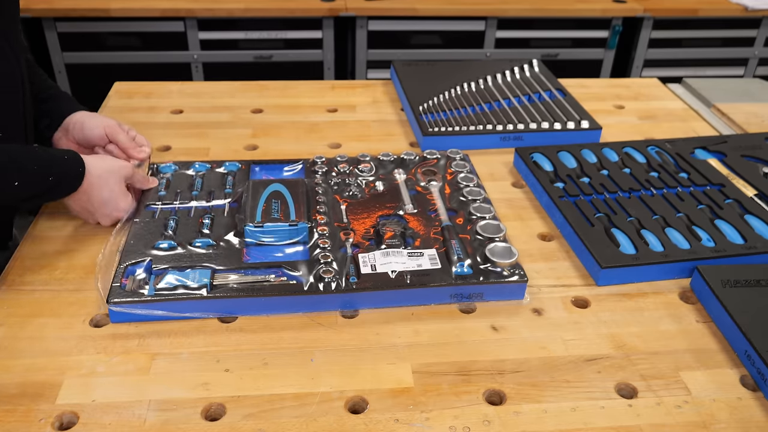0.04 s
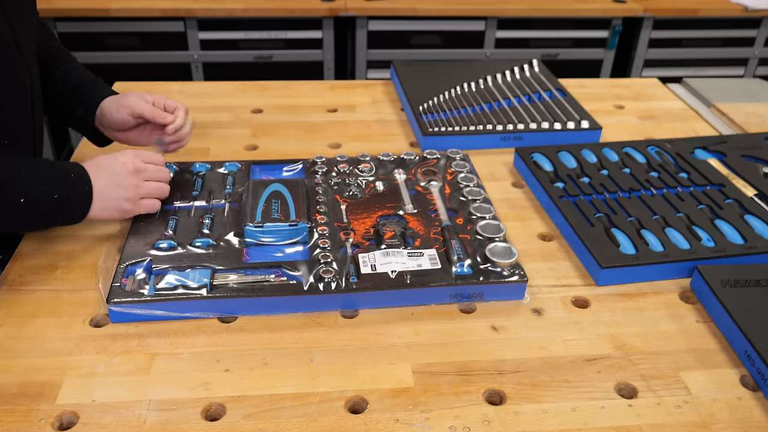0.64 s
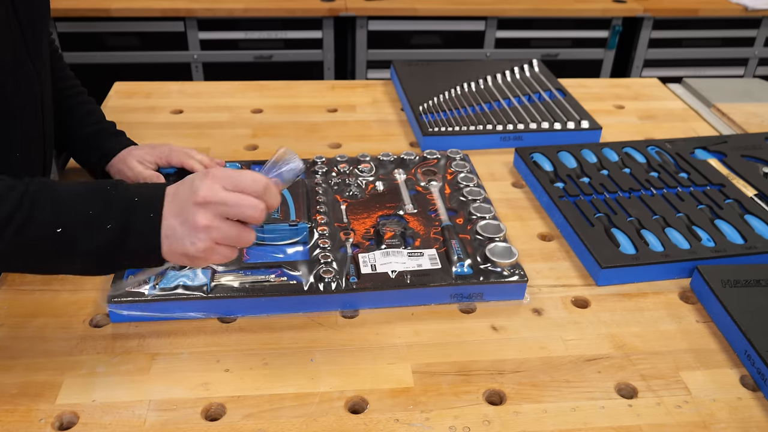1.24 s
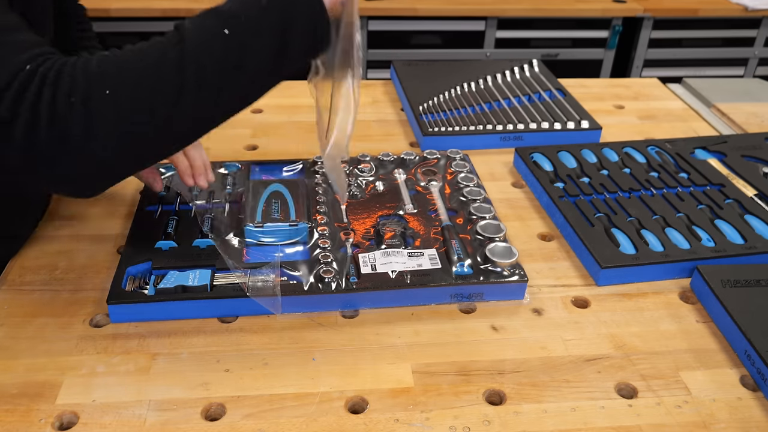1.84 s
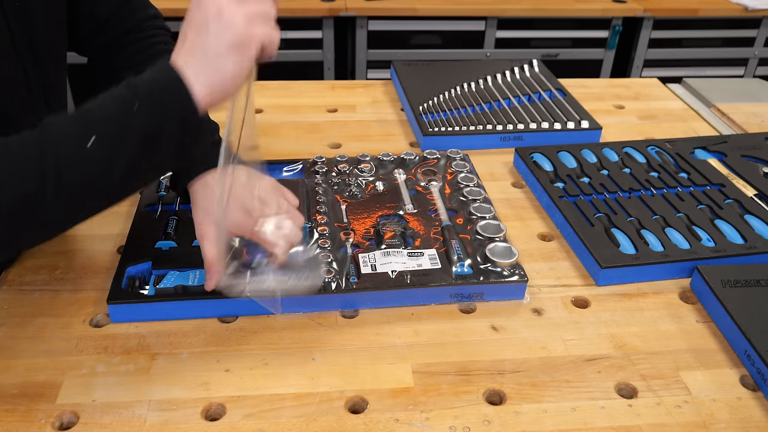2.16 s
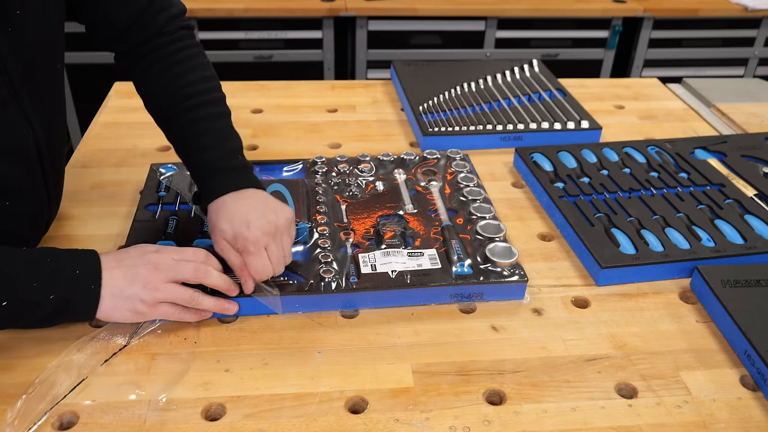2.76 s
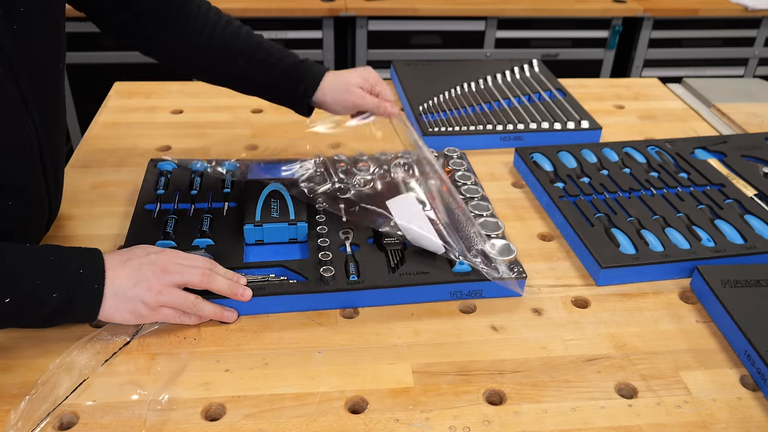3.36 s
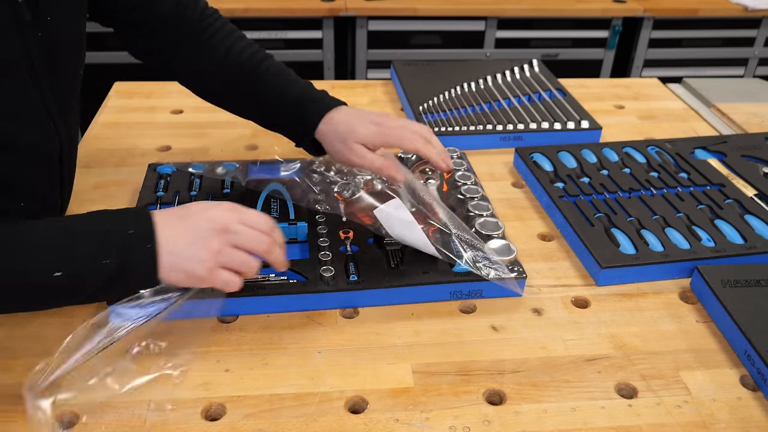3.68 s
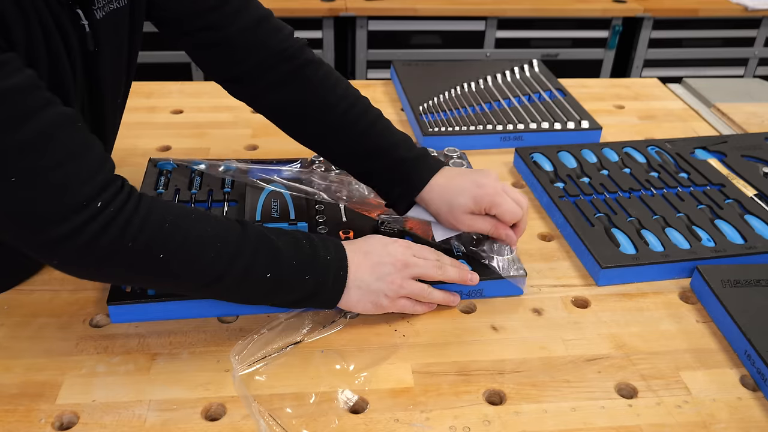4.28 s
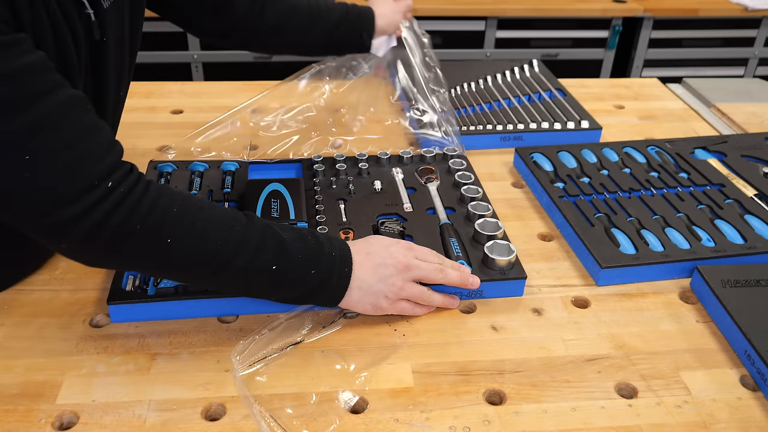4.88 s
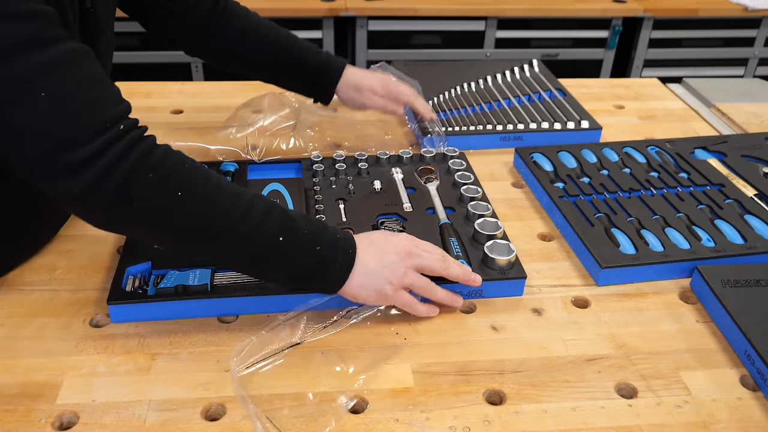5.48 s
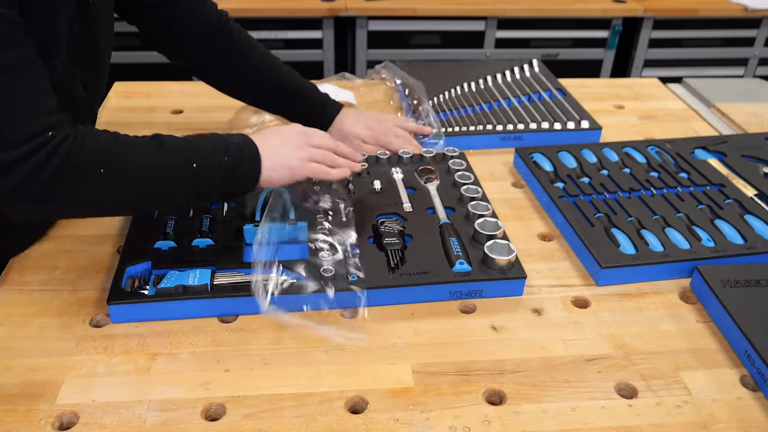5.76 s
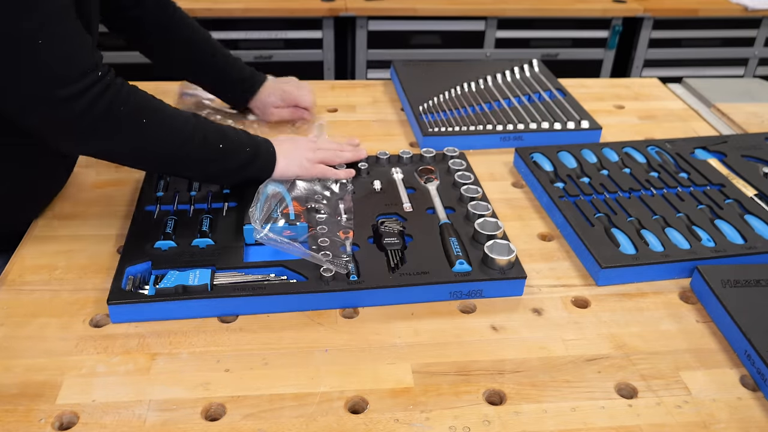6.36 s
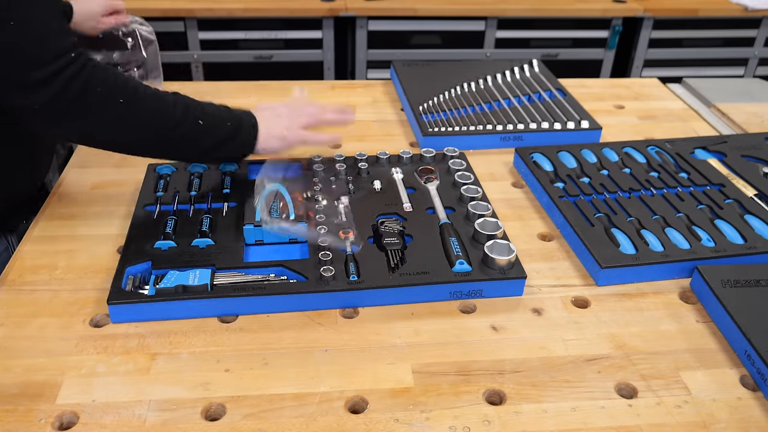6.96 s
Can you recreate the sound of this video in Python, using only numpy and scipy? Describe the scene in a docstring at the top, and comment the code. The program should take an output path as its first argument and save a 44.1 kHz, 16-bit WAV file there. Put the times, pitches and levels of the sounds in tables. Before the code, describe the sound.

In a quiet workshop, hands pull and scrunch thin plastic wrap from a foam tray, heard close up. A small rip opens the sound, then come about four swells of bright crackling with single sharp snaps and softer rustling between them. A few dull bumps on the bench sound underneath. A brief hollow swish comes in the last swell as the film slides away, over faint, low room noise.

```python
"""At a bench in a quiet workshop, thin plastic film is peeled off a foam tray and scrunched by hand.
Creases buckle in swarms, each radiating a bright tick and flapping the sheet around it; the biggest
snap through singly. The pulled film tears at a corner, splits along its edge and hisses over the foam
by stick-slip friction. Hands and tray thud on the bench, and reflections from the bench top and the
room follow over a low, steady background noise."""
import sys
import numpy as np
from scipy import signal
from scipy.fft import rfft, irfft, next_fast_len
from scipy.io import wavfile
from scipy.ndimage import uniform_filter1d, map_coordinates

SR = 44100
rng = np.random.default_rng(int(sys.argv[2]) if len(sys.argv) > 2 else 0)


def pcm_store(signal):
    """Save signal as 16-bit PCM."""
    levels = np.round(np.clip(np.atleast_2d(signal), -1, 1) * 32767)
    wavfile.write(sys.argv[1], SR, levels.astype(np.int16).T)


N = 318402
TOP_HZ = 15900
CALM_PER_S, BUSY_PER_S = 400, 2200  # creases buckling a second
ATTACK_S, RELEASE_DB_PER_S = .016, 420  # the grip tightens quickly; creases settle after it lets go
# The film's three voices. Each pair: offset from the handling level in dB, dB per dB of crispness.
FLAP_LAW, CRACKLE_LAW, FIZZ_LAW = (0.25, 0.02), (-8, .65), (-10.5, 1.01)

# Pulls and scrunches. Each row: start and length in seconds, then level, swell and crispness in dB.
HAND_STROKES = [(0.054, .045, -29.5, 0, 14.5), (0.55, 0.056, -38, 2, 7), (0.608, 0.024, -28, 1, 6),
                (0.756, 0.11, -38, 7, 6), (0.889, 0.047, -27, 7, 2), (0.935, .25, -18.5, 3.5, 1.5),
                (1.234, 0.059, -21, 2, 3), (1.33, 0.26, -22, -6, 0), (1.6, 0.19, -30, -6, -3),
                (2.179, 0.17, -50, 10, 12), (2.34, 0.027, -28.5, 0, 4), (2.464, .016, -32, 0, 5),
                (2.51, .13, -33, -1, 3), (2.787, 0.042, -38, 13, 6), (2.824, .105, -19.5, 5, 1),
                (2.941, 0.24, -18, -1, 1.5), (3.801, .085, -39, 4, 7), (4.203, 0.107, -28, 0, 0),
                (4.405, 0.058, -17.5, 2, 1), (4.486, 0.37, -25, 4.5, 3), (4.839, 0.072, -17.5, -4, -2),
                (4.918, 0.067, -18, 5, -4), (5.029, 0.082, -31, 0, -2), (5.225, 0.029, -33, 0, 7),
                (5.515, .16, -43, -1.5, 3.5), (5.844, 0.029, -27, 0, -4), (5.95, 0.2, -32, 9, 0),
                (6.149, 0.23, -22, 4, 4), (6.38, 0.41, -20, -2.5, 4), (6.903, 0.068, -31.5, -1, 4),
                (7.044, 0.022, -34.5, 0, 11), (7.154, 0.054, -28.5, -2, 0.5)]
# Light rustle of the held film. Each row: time in seconds, level in dB, crispness in dB.
HOLDING_RUSTLE = [(0, -41, -4), (0.151, -33, 0), (0.421, -38, 2), (0.521, -36, 3), (0.72, -45, 0),
                  (1.25, -24, -1), (1.9, -50, -1), (2.12, -57, 4.5), (2.449, -42, 2), (2.8, -38, 3),
                  (3.27, -31, -6), (3.599, -31, -2), (3.95, -40, 7), (4.17, -30, -7), (5.28, -35, -6),
                  (5.46, -46, -7), (5.76, -37, 3), (7.21, -34, 2.5)]
# Stretch of the sheet. Each row: time in seconds, tautness (0 is usual).
TAUTNESS = [(0.2, -0.13), (0.9, 1), (1.3, -0.56), (2.9, 0.75), (3.1, -0.1), (3.3, -0.58), (4.9, -0.87),
            (6.0, 0.4), (6.75, 0.98), (7.2, -1.05)]
# Spectra of the three voices. Each row: frequency in Hz, relative level in dB.
FLAP_SPECTRUM = [(25, -35), (45, -26), (90, -15.5), (150, -8), (280, -4), (500, 0.5), (780, -1), (1300, -4),
                 (1750, -16.5), (2600, -24), (5000, -76)]
CRACKLE_SPECTRUM = [(500, -48), (1100, 1), (1800, -6.5), (3200, -0.5), (5200, -4.5), (6500, -9.5),
                    (9000, -52)]
FIZZ_SPECTRUM = [(3000, -26), (5200, 0), (6500, -0.5), (8500, 1.5), (11300, -1.5), (14500, -5),
                 (16000, -12)]
# Big creases. Each row: start in seconds, crack in dB over 5 ms, flap in dB over 9 ms, crack centre in Hz.
BIG_CREASES = [(0.059, -14, -28, 5300), (0.135, -21, -18.5, 2800), (0.36, -28.5, -35, 2830),
               (0.862, -21, -26, 2130), (0.868, -13.5, -20, 2350), (0.913, -16.5, -34, 2394),
               (0.947, -16, -25, 2197), (1.036, -13.5, -18, 2540), (1.097, -14.5, -16, 2540),
               (1.191, -11.5, -16.5, 2590), (1.212, -19, -13.5, 2490), (1.241, -19, -18.5, 2049),
               (1.292, -20, -16, 2760), (1.579, -20, -18, 4095), (1.739, -25.5, -23, 4580),
               (1.759, -31, -29, 3000), (2.187, -42, -58, 3503), (2.238, -54, -35, 3460),
               (2.354, -38, -25.5, 3928), (2.474, -34, -29, 6493), (2.491, -25, -21, 3100),
               (2.749, -23.5, -25.5, 2150), (2.833, -21, -14.5, 2296), (2.873, -24, -18, 5575),
               (2.924, -16.5, -14, 3194), (2.989, -13, -25, 2394), (3.047, -19, -17, 3827),
               (3.057, -18, -12, 6070), (3.092, -18.5, -17, 5710), (3.205, -19, -20, 4910),
               (3.418, -22, -20, 2906), (3.534, -40, -23, 2587), (3.686, -17, -18.5, 4410),
               (3.778, -28, -47, 7520), (3.993, -27.5, -40, 5530), (4.078, -25, -27.5, 3206),
               (4.138, -23.5, -20.5, 3692), (4.212, -25, -11.5, 3489), (4.221, -15.5, -14.5, 4245),
               (4.247, -14.5, -19, 4304), (4.262, -18, -15.5, 2693), (4.28, -21.5, -24, 4410),
               (4.29, -19, -21, 3500), (4.299, -21, -23, 4500), (4.323, -26, -21.5, 4470),
               (4.35, -22.5, -19.5, 2720), (4.369, -24.5, -25, 5700), (4.374, -21.5, -25, 3340),
               (4.406, -17.5, -13, 4530), (4.416, -19.5, -17, 3480), (4.497, -11, -18.5, 3900),
               (4.54, -20, -24, 4785), (4.555, -19.5, -25, 6025), (4.57, -19, -25, 3180),
               (4.622, -21.5, -21, 4300), (4.643, -16.5, -18, 4110), (4.653, -13, -35, 3040),
               (4.674, -20.5, -39, 3473), (4.719, -21, -23, 7003), (4.81, -22, -22, 8010),
               (4.854, -18, -18, 5490), (4.905, -24, -14.5, 3512), (4.915, -17, -15, 7810),
               (4.983, -22, -16, 4792), (5.24, -30, -29, 5693), (5.331, -42, -26, 2862),
               (5.573, -44.5, -26.5, 2996), (5.704, -32, -25, 3300), (5.858, -27, -21.5, 3142),
               (5.987, -24, -20, 3605), (6.022, -20.5, -20.5, 3110), (6.079, -20, -17.5, 7487),
               (6.1, -19.5, -22, 4510), (6.12, -22, -15, 3483), (6.184, -17.5, -18, 3497),
               (6.369, -18.5, -20, 4592), (6.445, -21, -15, 3800), (6.498, -26, -20, 3499),
               (6.775, -20, -16, 3000), (6.782, -16.5, -24, 2199), (6.829, -17.5, -22, 3900),
               (6.95, -27, -18.5, 4994), (7.053, -27, -28.5, 4713), (7.164, -34, -22, 3008)]
# Tears at the corner. Each row: start in seconds, level in dB, length in seconds.
CORNER_TEARS = [(0.06, -12.5, 0.0073), (0.077, -14.5, 0.021)]
# Film rubbing at the corner, across the tray, then dragged off. Each row: time in seconds, level in dB.
CORNER_RUB_LEVEL = [(0, -41), (0.1, -33), (0.3, -35), (0.42, -41), (0.52, -39.5), (0.68, -78)]
TRAY_RUB_LEVEL = [(3.15, -84), (3.24, -40), (3.4, -38), (3.55, -35.5), (3.63, -33), (3.75, -94)]
DRAG_LEVEL = [(5.6, -74), (6.05, -25.5), (6.3, -22), (6.41, -11), (6.49, -25.5), (6.7, -44), (6.95, -82)]
# Tension retunes the rubbing film. Each row: time in seconds, pitch ratio.
RUB_TUNING = [(0, 0.97), (0.25, 0.97), (0.55, .97), (3.25, 1.03), (3.6, 1.014)]
# Film resonances in each action. Each row: frequency in Hz, half-width in Hz, relative level in dB.
SPLIT_RESONANCES = [(1630, 450, -2), (2410, 800, 0)]
TEAR_RESONANCES = [(1090, 330, 3), (1430, 460, 3.5), (2450, 1300, -7.5)]
CORNER_RESONANCES = [(3690, 300, 5), (4080, 430, 1), (4990, 260, 1.5), (7140, 920, -11)]
TRAY_RESONANCES = [(1699, 260, 3.26), (2522, 242, 2.2), (4560, 350, 3.7)]
DRAG_RESONANCES = [(690.2, 256, 0.00048)]
# Hands and tray striking the bench. Each row: start in seconds, peak level in dB.
BENCH_BUMPS = [(0.089, -29), (0.647, -26), (1.733, -32), (3.339, -21.5), (3.417, -25), (3.534, -23),
               (4.215, -18), (4.423, -24.5), (4.79, -24.5), (6.759, -25)]
# Reverberation of the workshop. Each row: frequency in Hz, time to fall 60 dB in seconds.
ROOM_DECAY = [(150, 0.81), (1000, 1), (5000, 0.95), (15000, 0.021)]
# Lateral reflections. Each row: frequency in Hz, level of side against mid in dB.
SIDE_SPECTRUM = [(60, -20), (450, -29.5), (3000, -24), (15000, -17.5)]
# Background noise of the workshop. Each row: frequency in Hz, relative level in dB.
AMBIENT_SPECTRUM = [(20, -22), (60, -3.5), (160, -0.5), (370, -8), (520, -5), (1200, -20), (8500, -28.5),
                    (16000, -59)]


def crinkle(uneven_db=1, crackle_size_db=5.0, fizz_size_db=3.5, flap_size_db=2.5):
    """Buckling as a Poisson process: creases give way more often the harder the film is worked."""
    grip_db = uneven_db * wobble(28)  # the fingers never pull quite evenly
    flap_db, crackle_db, fizz_db = (handling(law) + grip_db for law in (FLAP_LAW, CRACKLE_LAW, FIZZ_LAW))
    effort = np.clip((crackle_db + 50) / 28, 0, 1)
    expected_count = np.cumsum(CALM_PER_S + (BUSY_PER_S - CALM_PER_S) * effort ** 4) / SR
    gap, bulk, extra = rng.exponential(size=(12000, 3)).T  # a few creases are far bigger than the rest
    keep = np.cumsum(gap) < expected_count[-1]
    times = np.interp(np.cumsum(gap)[keep], expected_count, np.arange(N) / SR)
    bulk, extra = np.minimum(bulk[keep], 4), np.minimum(extra[keep], 3)
    crackle = facets(times, crackle_size_db * bulk, centre_hz=3130, scatter=0.478, cycles=2.1, size=192)
    fizz = facets(times, fizz_size_db * bulk + extra, centre_hz=8780, scatter=0.335, cycles=5.5, size=96)
    # slow bending waves carry the flap out just after the tick
    flap = facets(times + 0.00074, flap_size_db * bulk + 2 * extra,
                  centre_hz=714, scatter=0.62, cycles=0.97, size=400)
    flap = film_voice(flap, FLAP_SPECTRUM, flap_db, rub_db=-0.5, even_s=0.038)
    crackle = film_voice(crackle, CRACKLE_SPECTRUM, crackle_db, rub_db=-1, even_s=0.035)
    fizz = film_voice(fizz, FIZZ_SPECTRUM, fizz_db, rub_db=3, even_s=0.042)
    return stretched(flap, stretch_db=3.0) + wandering(crackle + fizz, depth_db=1.5)


def handling(law):
    """Incoherent sources add in power: strokes and holding rustle give one voice's level in dB."""
    offset_db, per_crisp = law
    t = np.arange(0, N / SR, .001)
    hold_s, hold_db, hold_crisp = np.transpose(HOLDING_RUSTLE)
    power = amp(np.interp(t, hold_s, hold_db + per_crisp * hold_crisp)) ** 2
    for start, length, db, swell_db, crisp in HAND_STROKES:
        rise = np.clip((t - start) / ATTACK_S, 0, 1)
        progress = np.clip((t - start) / length, 0, 1)
        release_db = RELEASE_DB_PER_S * np.clip(t - start - length, 0, 1)
        power += (rise * amp(db + swell_db * progress - release_db + per_crisp * crisp)) ** 2
    return offset_db + np.interp(np.arange(N) / SR, t, 10 * np.log10(power))


def facets(times, sizes_db, centre_hz, scatter, cycles, size):
    """Damped free vibration: each facet of film rings for a few cycles at a pitch of its own."""
    pitch, life, polarity = rng.standard_normal((len(times), 3)).T[:, :, None]
    hz = np.clip(centre_hz * np.exp(scatter * pitch), 60, TOP_HZ)
    turns = hz * np.arange(size) / SR
    ring = np.sin(2 * np.pi * turns) * np.exp(-turns / (cycles * np.exp(0.45 * life)))
    return place(times, amp(sizes_db)[:, None] * np.sign(polarity) * np.sqrt(hz) * ring)


def film_voice(grains, spectrum, level_db, rub_db, even_s):
    """Source and filter: whitened grains and rubbing noise take the film's spectrum and level."""
    hz, power = signal.welch(grains, SR, nperseg=512)
    grain_db = 10 * np.log10(power / power.max() + 1e-4)
    white = unit(coloured(grains, lambda f: -np.interp(f, hz, grain_db)))
    source = levelled(white, even_s) + amp(rub_db) * rng.standard_normal(N)
    return amp(level_db) * levelled(coloured(source, lambda f: along(spectrum, f)), even_s)


def stretched(flap, stretch_db):
    """Tension tilts the spectrum: a taut sheet loses its low billow and gains in its upper range."""
    low = signal.sosfiltfilt(signal.butter(2, 400, "low", fs=SR, output="sos"), flap)
    high = signal.sosfiltfilt(signal.butter(2, 1000, "high", fs=SR, output="sos"), flap)
    stretch = amp(stretch_db * curve(TAUTNESS))
    return flap + low * (1 / stretch - 1) + high * (stretch - 1)


def wandering(x, depth_db):
    """Resonances depend on shape, so the spectral peaks wander as the sheet deforms."""
    spectra = signal.stft(x, nperseg=512)[2]
    drift = rng.standard_normal(spectra.shape)
    for _ in range(2):
        drift = uniform_filter1d(uniform_filter1d(drift, size=6, axis=0), size=28, axis=1)
    return signal.istft(spectra * amp(depth_db * drift / drift.std()), nperseg=512)[1][:N]


def snaps(hollow_db=6, hollow_ratio=0.265, skirt_db=10, ring_t60=0.0098, glide=0.56, size=1536):
    """Snap-through: a big crease flips with a pitched crack, then the loose sheet around it flaps."""
    times, crack_db, flap_db, centre_hz = np.transpose(BIG_CREASES)
    centre_hz = centre_hz[:, None]
    t = np.arange(size) / SR
    # long, low creases ring in a narrow band; short, high ones click across the whole treble
    db_per_octave = skirt_db * np.median(centre_hz) / centre_hz
    click = bursts(len(times), t60=0.006, attack=.0001, size=size)
    click = coloured(click, lambda f: -db_per_octave * np.abs(octaves(f, centre_hz)))
    # dispersion: short bending waves outrun long ones, so the ring falls in pitch
    hz = 0.838 * centre_hz * (1 + glide * np.exp(-t / 0.00053))
    phase = np.cumsum(2 * np.pi * hz / SR + rng.normal(0, 0.21, hz.shape), axis=1)
    ring = np.sin(phase) * amp(-60 * t / ring_t60) * (1 - np.exp(-t / .00025))
    crack = unit(click) + unit(ring)
    # the pocket of film beside the crease gives each flap a hollow note
    pocket = lambda f: hollow_db * np.exp(-(octaves(f, hollow_ratio * centre_hz) / 0.21) ** 2)
    flap = bursts(len(times), t60=0.013, attack=0.0005, size=size)
    flap = coloured(flap, lambda f: along(FLAP_SPECTRUM, f) + np.log2(f + 1) + pocket(f))
    sized = lambda x, db, span_s: amp(db)[:, None] * unit(x) * np.sqrt(span_s * SR / size)
    return place(times, sized(crack, crack_db, .005)) + place(times + .0006, sized(flap, flap_db, .009))


def splitting(offset_db=-7.0, per_taut_db=6):
    """Crack growth: tiny ruptures run along the pulled edge, louder with effort and tension."""
    ruptures = jerks(depth_db=5, per_s=420)
    strain_db = handling(CRACKLE_LAW) + per_taut_db * curve(TAUTNESS)
    return amp(offset_db + strain_db) * unit(resonate(ruptures, SPLIT_RESONANCES))


def tear(fade_t60=0.052, attack_s=0.0013):
    """Fracture: two quick runs of tiny ruptures excite the resonances of the tight corner."""
    t = np.arange(N) / SR
    envelope = np.zeros(N)
    for start, db, length in CORNER_TEARS:
        fade_db = 60 * np.maximum(t - start - length, 0) / fade_t60
        envelope += amp(db - fade_db) * np.clip((t - start) / attack_s, 0, 1)
    return envelope * unit(resonate(jerks(depth_db=3, per_s=506), TEAR_RESONANCES))


def rub(levels, modes, flutter_db=0.5, jerks_per_s=300):
    """Stick-slip friction: film jerks over the foam, driving resonances that shift with tension."""
    hiss = resonate(jerks(flutter_db, jerks_per_s), modes)
    retuned = map_coordinates(hiss, [np.cumsum(curve(RUB_TUNING))], order=3, mode="wrap")
    return amp(curve(levels)) * unit(retuned)


def bumps(centre_hz=120, skirt_db=4.5):
    """Soft impacts excite mainly low frequencies: the foam tray meets the bench with dull thuds."""
    times, peak_db = np.transpose(BENCH_BUMPS)
    thud = bursts(len(times), t60=0.13, attack=0.0038, size=8192)
    thud = coloured(thud, lambda f: -skirt_db * octaves(f, centre_hz) ** 2)
    return place(times, amp(peak_db)[:, None] * thud / np.abs(thud).max(axis=1, keepdims=True))


def room(x, bench_db=-12, tail_db=-18):
    """Direct sound is followed by early reflections off the bench, then by reverberation."""
    bench = scattered(x, [(500, 0.044), (8000, 0.019)], delay_s=.002)
    return x + amp(bench_db) * bench + amp(tail_db) * scattered(x, ROOM_DECAY, delay_s=.009)


def scattered(x, t60s, delay_s, count=24):
    """Diffuse reflection: the impulse response keeps changing as the film and arms move."""
    hz, t, spectra = signal.stft(rng.standard_normal((count, SR // 4)), SR, nperseg=128)
    tails = signal.istft(spectra * amp(-60 * t / along(t60s, hz)[:, None]), SR, nperseg=128)[1]
    tails /= np.linalg.norm(tails, axis=1, keepdims=True)
    hop = N // (count - 1) + 1
    starts = hop * np.arange(count)[:, None]
    pieces = np.pad(x, (hop, 2 * hop))[starts + np.arange(2 * hop)] * np.hanning(2 * hop)
    wet = signal.fftconvolve(pieces, tails, axes=1)
    index = starts + np.arange(wet.shape[1]) + int(delay_s * SR)
    return np.bincount(index.ravel(), wet.ravel())[hop:hop + N]


def ambience(level_db=-49):
    """Stationary noise, strongest in the bass, fills the workshop."""
    return amp(level_db) * unit(coloured(rng.standard_normal(N), lambda f: along(AMBIENT_SPECTRUM, f)))


def resonate(x, modes):
    """Forced resonance: x drives a few broad modes that radiate little below their pitch."""
    peak = lambda f, hz, width: np.minimum((f + 1) / hz, 1) / (1 + ((f - hz) / width) ** 2)
    power = lambda f: sum((amp(db) * peak(f, hz, width)) ** 2 for hz, width, db in modes)
    return coloured(x, lambda f: 10 * np.log10(power(f)))


def coloured(x, gain_db):
    """Minimum-phase filtering of each row; gain_db is a function of Hz."""
    n = x.shape[-1]
    m = 2 * next_fast_len(n // 2 + 1024)
    cepstrum = irfft(np.log(amp(gain_db(np.fft.rfftfreq(m, 1 / SR))) + 1e-6), m)
    fold = 1 + np.sign(m // 2 - np.arange(m))  # folding the cepstrum makes the filter causal
    fold[0] = 1
    return irfft(rfft(x, m) * np.exp(rfft(cepstrum * fold)), m)[..., :n]


def jerks(depth_db, per_s):
    """Noise under random amplitude modulation."""
    return rng.standard_normal(N) * amp(depth_db * wobble(per_s))


def bursts(count, t60, attack, size):
    """Rows of noise with a fast rise and exponential decay."""
    t = np.arange(size) / SR
    return rng.standard_normal((count, size)) * amp(-60 * t / t60) * (1 - np.exp(-t / attack))


def place(times, sounds):
    """Superposition of short sounds (rows), each starting at its time."""
    index = np.maximum(np.round(times * SR), 0).astype(int)[:, None] + np.arange(sounds.shape[1])
    return np.bincount(index.ravel(), sounds.ravel(), N)[:N]


def wobble(rate):
    """A continuous random curve, rate knots a second."""
    knots = rng.standard_normal(int(N * rate / SR) + 4)
    return map_coordinates(knots, [np.arange(N) * rate / SR], order=1)


def levelled(x, span_s):
    """The signal divided by its running rms."""
    span = int(span_s * SR)
    power = uniform_filter1d(uniform_filter1d(x ** 2, span), span)
    return x / np.sqrt(np.abs(power) + 1e-12)


def curve(points):
    """(seconds, value) points interpolated at every sample."""
    return np.interp(np.arange(N) / SR, *np.transpose(points))


def along(points, hz):
    """(Hz, value) points interpolated on a log axis."""
    knot_hz, values = np.transpose(points)
    return np.interp(np.log(hz + 1), np.log(knot_hz + 1), values)


def octaves(hz, centre_hz):
    """Interval above the centre in octaves."""
    return np.log2((hz + 1) / centre_hz)


def unit(x):
    """Each row at rms 1."""
    return x / np.sqrt(np.mean(x ** 2, axis=-1, keepdims=True) + 1e-20)


def amp(db):
    """Decibels as an amplitude ratio."""
    return 10 ** (np.asarray(db) / 20)


def scene():
    """Film, tray and room superpose almost in mono; only lateral reflections part left from right."""
    pulls = rub(CORNER_RUB_LEVEL, CORNER_RESONANCES) + rub(TRAY_RUB_LEVEL, TRAY_RESONANCES)
    film = crinkle() + splitting() + snaps() + tear() + pulls
    film += rub(DRAG_LEVEL, DRAG_RESONANCES, flutter_db=3.0, jerks_per_s=150)  # hollow swish
    air = ambience()
    mid = room(film + bumps()) + air
    lateral = scattered(mid, [(300, 0.019), (8000, 0.022)], delay_s=0)
    side = coloured(lateral, lambda f: along(SIDE_SPECTRUM, f))
    return np.array([mid + side, mid - side])


def record(dry):
    """Soft saturation flattens the highest peaks, and a band limit removes all above TOP_HZ."""
    limited = dry / (1 + np.abs(dry) ** 8) ** (1 / 8)
    m = next_fast_len(N + 8192)
    passband = np.fft.rfftfreq(m, 1 / SR) < TOP_HZ
    return irfft(rfft(limited, m) * passband, m)[:, :N]


dry = scene()
out = record(dry)
pcm_store(out)
```